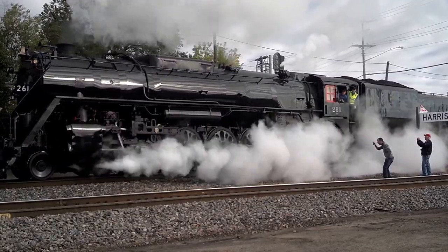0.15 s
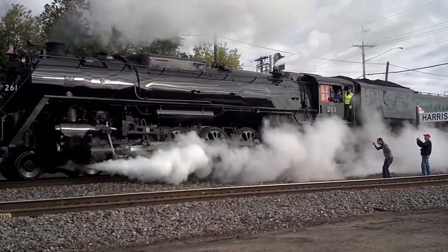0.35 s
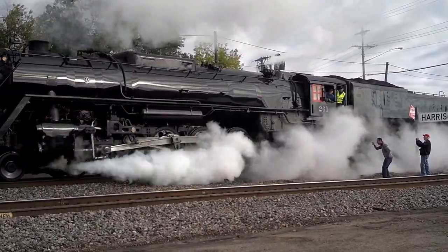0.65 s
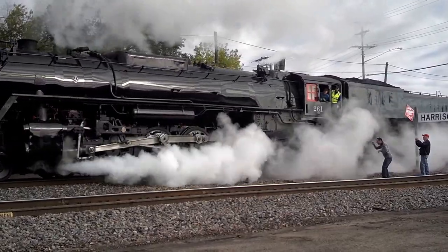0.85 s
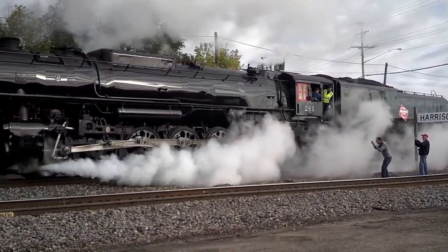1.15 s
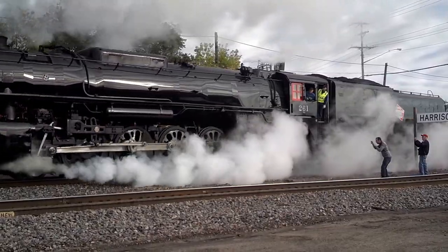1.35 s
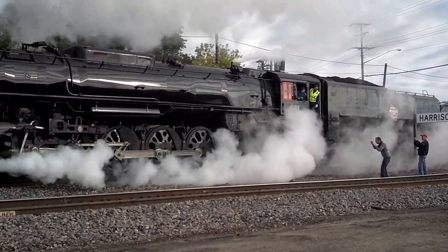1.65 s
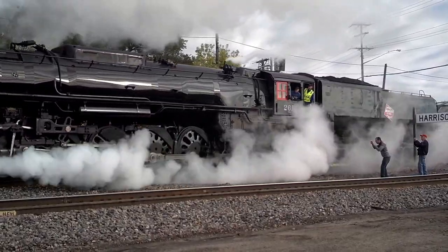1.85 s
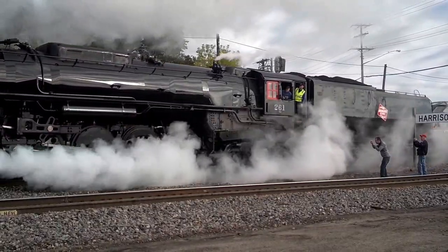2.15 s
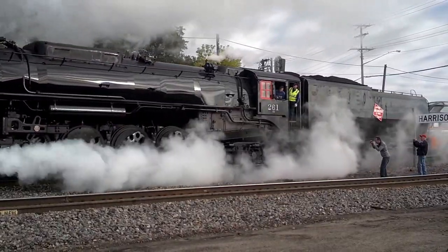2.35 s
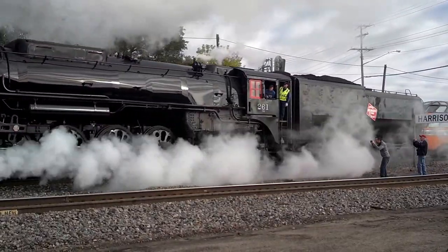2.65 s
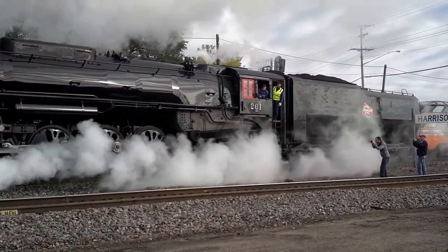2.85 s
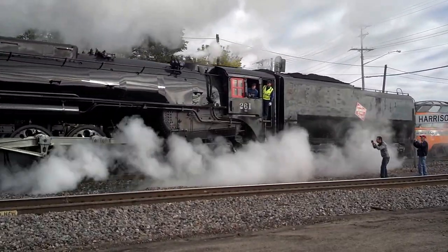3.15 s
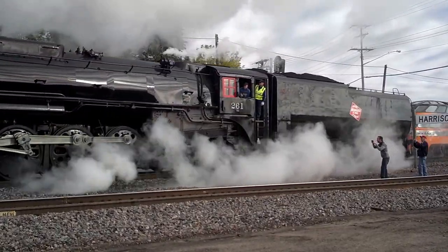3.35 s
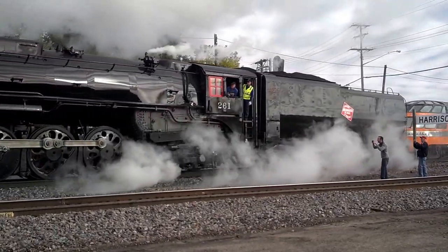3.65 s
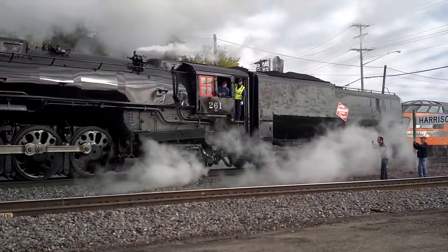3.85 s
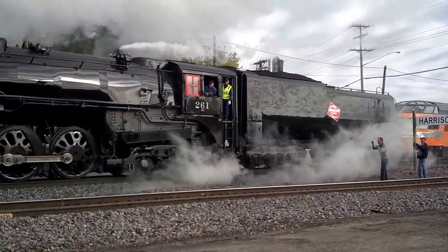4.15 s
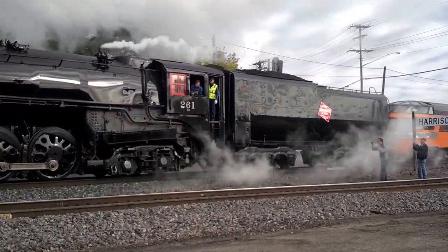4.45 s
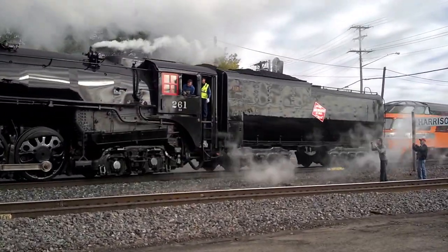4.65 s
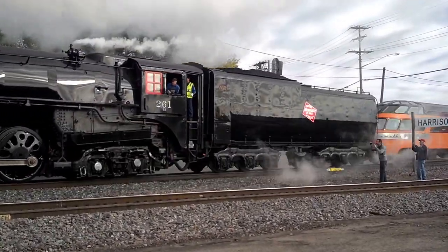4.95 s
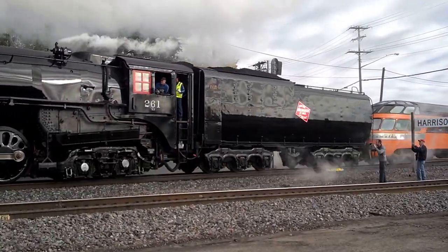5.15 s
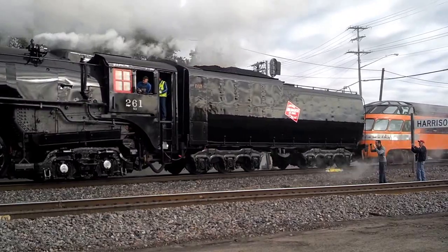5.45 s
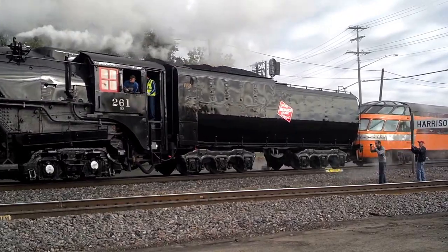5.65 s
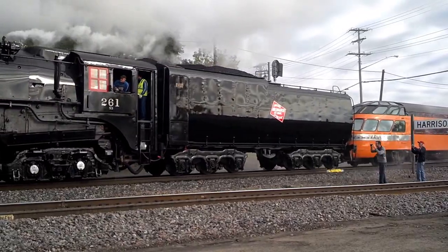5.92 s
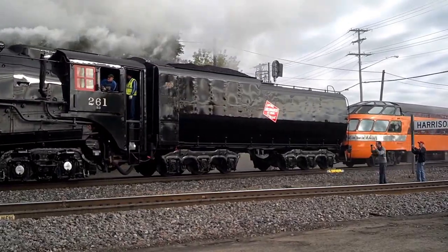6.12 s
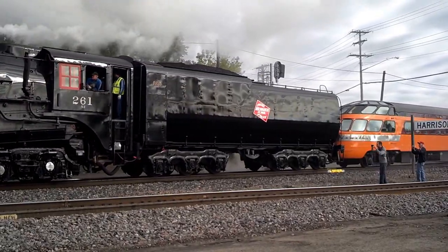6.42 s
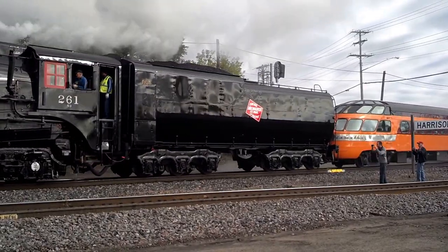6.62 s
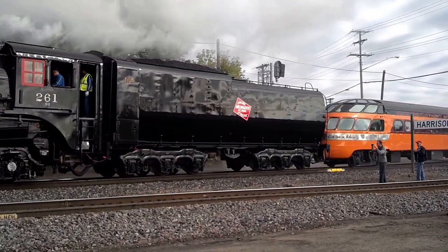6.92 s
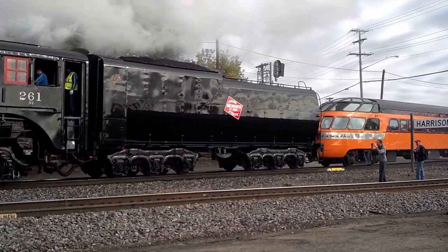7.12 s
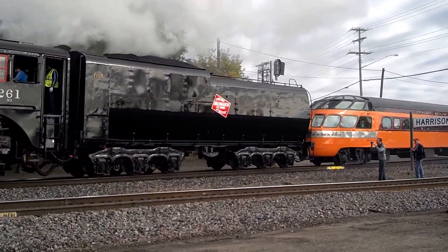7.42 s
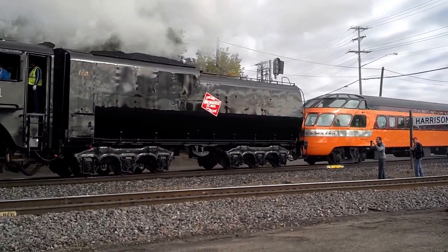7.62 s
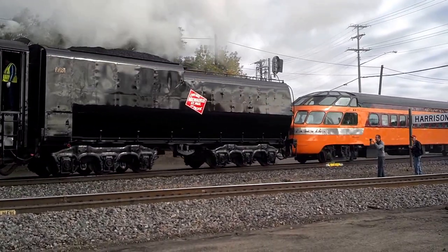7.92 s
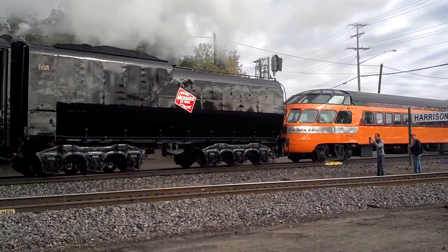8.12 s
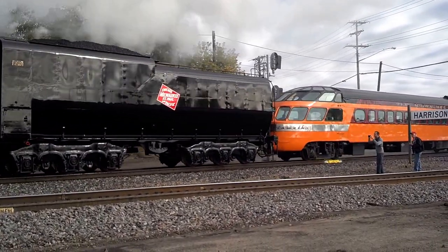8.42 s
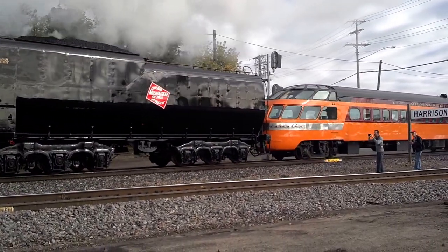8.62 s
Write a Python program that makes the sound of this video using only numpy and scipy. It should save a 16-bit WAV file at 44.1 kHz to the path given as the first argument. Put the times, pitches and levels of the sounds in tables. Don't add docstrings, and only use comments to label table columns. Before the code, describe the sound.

Outdoors beside the track, a steam locomotive pulls away. A low seeping hiss snaps into a one-second blast of bright, roaring steam, dips, then blasts again. A third blow is cut short and the steam shuts off. Much quieter afterwards: leaking hiss with soft puffs, dull regular chuffs, a thin high whistle and turbine whine, while wind bumps and rumbles on the close wide stereo microphone, heavier on the right.

```python
import sys
import numpy as np
from scipy import signal
from scipy.fft import rfft, irfft, next_fast_len
from scipy.io import wavfile
from scipy.ndimage import uniform_filter1d

SR = 44100
rng = np.random.default_rng(int(sys.argv[2]) if len(sys.argv) > 2 else 0)


def volts_from_db(level):
    exponent = np.asarray(level, float) / 20
    return 10 ** exponent


def unload_wav(signal):
    wavfile.write(
        sys.argv[1],
        SR,
        np.round(np.clip(np.atleast_2d(signal).T, -1, 1) * 32767).astype(np.int16),
    )


N = 387198
FRAME, HOP = 512, 128
SHUT_S = 2.872

# f/Hz, level/dB
JET_COLOUR = [(90, -12), (190, -7), (300, -13.5), (700, -4), (1200, 1.5), (1700, 3.5), (2200, -2.5),
              (2900, 3.5), (3900, -2), (5000, 4.5), (6500, -1), (8000, -1), (9500, 2.5), (11500, 1),
              (13200, 2.5), (15500, 1.5)]
# f/Hz, width/Hz, level/dB, drift/dB per s as the jet turns
NOZZLE_BANDS = [(1750, 210, 4, -2.5), (2060, 230, 1, 1.5), (2920, 80, -1.4, 1), (4380, 210, -2, 2.7),
                (5230, 68, -5, 0), (8470, 220, 3.5, 1.2), (13850, 2000, 3, -0.7)]
# opens t/s, blow/s, pressure level/dB, sag/dB, seep before/s
STROKES = [
    (0.228, 0.98, -19, -3.5, 0.23),
    (1.519, 1.01, -18.5, -3.5, 0.25),
    (2.816, 0.072, -19, 0.1, 0.17),
]
# t/s, level/dB
LEAK_LEVEL = [(2.9, -37.5), (3.6, -43.5), (4.1, -47.5), (4.6, -46), (5.2, -48), (5.45, -45), (5.85, -45.5),
              (6.1, -48), (6.4, -47), (6.85, -49), (7.25, -53.5), (7.5, -51.5), (7.65, -47), (7.95, -45.5),
              (8.25, -47), (8.45, -53.5), (8.78, -50.5)]
# f/Hz, level/dB
LEAK_COLOUR = [(60, 1), (150, 17.5), (400, -1.5), (650, -3.5), (850, 2.5), (1200, -2.5), (1600, 0.5),
               (2000, 2.5), (3500, 1.5), (5000, 3), (7000, -1.5), (10000, 1), (15500, -3)]
# t/s, level over hiss/dB, length/s, fizz level/dB
PUFFS = [
    (3.167, 2.5, 0.039, 4),
    (3.822, 7, 0.13, -2),
    (5.035, 8, 0.16, -7),
    (6.195, 7, 0.17, 0),
    (7.097, 6.5, 0.21, -5),
    (8.293, 4, 0.064, 2),
]
# t/s, level/dB, length/s, brightness/dB
CHUFFS = [
    (3.857, -38, 0.11, -5.5),
    (4.466, -30.5, 0.12, -14),
    (5.073, -29.5, 0.16, -11),
    (5.642, -29, 0.1, -17),
    (6.21, -30.5, 0.094, -9),
    (6.788, -30.5, 0.14, -4),
    (7.39, -34, 0.18, -3.5),
    (7.93, -32, 0.17, -9),
    (8.452, -39, 0.077, 1),
]
# f/Hz, width/Hz, level/dB
STACK = [(400, 97, 9.5), (1129, 60, -6), (1770, 46, -15), (2050, 660, -2.5)]
# multiple of shaft speed, level/dB, loudest t/s, span/s
SHAFT_ORDERS = [(13, -3, 5.7, 3.4), (14, -1, 7.5, 2.4), (15, -16, 8.0, 0.9), (16, -1, 4.5, 2.5),
                (23, -11, 2.9, 6), (24, -5.5, 4.7, 2), (24, -9.5, 7.94, 1.4), (30, -10, 3, 5.9),
                (31, -4.5, 5.3, 1.7), (34, -10.5, 3, 6.6), (42, -4, 14.3, 11.5), (52, -5, 5.1, 4.2),
                (58, -6.5, 5.3, 6.3), (59, -5.5, 8.4, 1.8), (59, -7, 4.9, 1.5), (63, -9, 5.1, 1.3),
                (64, -7, 8.25, 1.7), (84.3, -6, 6.9, 1.6), (88.7, -8.5, 5.9, 9), (180, -1, 8.8, 3.4)]
# t/s, blade tone level/dB, length/s
SURGES = [(3.5, -66, 0.44), (4.47, -53.5, 0.2), (4.76, -52, 0.16), (4.97, -64, 0.24), (5.4, -55.5, 0.43),
          (6.27, -63, 0.33), (6.65, -68, 0.27), (7.7, -70, 0.16), (7.92, -64, 0.15), (8.25, -57.5, 0.16),
          (8.74, -55.5, 0.28)]
# t/s, level/dB, length/s
SWELLS = [(3.05, -55, 0.052), (3.25, -46, 0.17), (3.55, -46.5, 0.42), (3.82, -47.5, 0.36),
          (4.15, -47, 0.14), (4.42, -51, 0.29), (4.65, -51, 0.13), (4.83, -44, 0.19), (5.03, -57, 0.06),
          (5.14, -56, 0.065), (5.25, -44, 0.16), (5.55, -38.5, 0.15), (5.86, -38.5, 0.13),
          (6.02, -48, 0.098), (6.23, -47, 0.12), (6.35, -48, 0.1), (6.54, -56, 0.089), (6.67, -46.5, 0.38),
          (6.86, -41.5, 0.15), (7.14, -50, 0.14), (7.42, -53, 0.085), (7.57, -62, 0.062), (7.74, -53, 0.33),
          (8.0, -46.5, 0.21), (8.34, -43.5, 0.2), (8.66, -50.5, 0.23)]
# t/s, level/dB, length/s
GUSTS = [(3.22, -31, 0.16), (3.49, -35, 0.053), (3.6, -39, 0.042), (3.75, -32, 0.076), (3.87, -39, 0.036),
         (4.2, -50, 0.18), (4.5, -41.5, 0.27), (4.91, -39.5, 0.12), (5.05, -35.5, 0.2), (5.2, -41, 0.068),
         (5.28, -46, 0.04), (5.63, -40, 0.13), (5.93, -40.5, 0.26), (6.25, -36, 0.21), (6.41, -26, 0.029),
         (6.59, -29, 0.02), (6.8, -33, 0.23), (6.99, -41, 0.04), (7.15, -31, 0.14), (7.24, -38, 0.025),
         (7.39, -36, 0.17), (7.57, -38, 0.017), (7.93, -30, 0.13), (8.1, -37, 0.097), (8.21, -33, 0.072),
         (8.33, -33.5, 0.15), (8.4, -37, 0.22), (8.51, -35, 0.082), (8.64, -28.5, 0.1), (8.78, -33, 0.1)]
# f/Hz, level/dB
WIND_COLOUR = [(25, -28), (60, -16), (100, 5), (150, 4), (220, -2), (320, -4), (480, -10), (700, -23),
               (1000, -30.5), (1500, -41.5)]
# t/s, level/dB, length/s
BLASTS = [(0.68, -42, 0.53), (2.08, -43.5, 0.22), (2.45, -49, 0.22), (0.31, -37, 0.2), (0.52, -32, 0.075),
          (0.63, -40, 0.029), (0.82, -31.5, 0.03), (0.94, -29, 0.15), (1.15, -49, 0.11),
          (1.56, -27.5, 0.062), (1.62, -27.5, 0.045), (1.72, -29, 0.09), (1.86, -28, 0.14),
          (1.99, -27.5, 0.17), (2.15, -36, 0.15), (2.28, -28, 0.15), (2.85, -34.5, 0.064)]
# f/Hz, level/dB
BLAST_COLOUR = [(25, -44.5), (60, -3), (120, -5), (200, 1.5), (330, 1.5), (500, -4), (800, -9),
                (1500, -24.5)]
# t/s, peak level/dB, f/Hz, sharpness/dB
BUFFETS = [(3.498, -27, 352, -17), (3.757, -25.5, 348, -9), (4.87, -18, 258, -11), (4.902, -27, 393, -5),
           (5.013, -21, 264, -14), (5.035, -10, 196, -15), (5.206, -15.5, 180, -8), (5.279, -20, 364, -16),
           (5.391, -32, 250, -2), (5.594, -23, 355, -14), (5.62, -23, 372, -6), (5.884, -18.5, 315, -17),
           (5.93, -15, 214, -17), (6.062, -26, 366, -8), (6.18, -23, 355, -11), (6.262, -27, 253, -7),
           (6.407, -13, 340, -8), (6.585, -33, 369, -22), (6.699, -27, 410, -14), (6.732, -36, 315, -4),
           (6.761, -21, 404, -10), (6.787, -30, 450, -7), (6.859, -21, 353, -11), (6.974, -29, 445, -1),
           (7.073, -18.5, 223, -2), (7.113, -26, 347, 0), (7.154, -11, 199, -7), (7.185, -17.5, 290, -1),
           (7.241, -16.5, 239, -1), (7.31, -24, 335, -14), (7.383, -22, 466, -16), (7.484, -19, 288, 0.5),
           (7.703, -15.5, 434, -13), (7.851, -31, 390, -6), (7.893, -27, 444, -11), (8.176, -18.5, 346, -8),
           (8.201, -16, 370, -11), (8.28, -20, 256, -4), (8.309, -13.5, 366, -25), (8.375, -20, 191, -4),
           (8.39, -23.5, 420, 0.5), (8.395, -12, 277, 2.5), (8.422, -20, 440, -16),
           (8.511, -17.5, 377, -20), (8.534, -28, 242, -4), (8.595, -20, 385, -11),
           (8.622, -16.5, 430, -4.5), (8.706, -35, 313, 0), (8.726, -19, 310, -19)]
# t/s, peak level/dB, f/Hz, sharpness/dB
JOLTS = [(0.283, -27, 519, 1), (0.437, -31, 439, -3), (0.509, -16, 287, -20), (0.608, -27, 495, -7),
         (0.667, -35, 390, -12), (0.794, -25, 331, 0), (0.821, -35, 293, -23), (0.888, -36, 340, -6),
         (0.939, -23, 430, -16), (1.101, -44, 406, -4), (1.367, -34, 275, -7), (1.52, -32, 474, -6),
         (1.555, -12.5, 277, -8), (1.609, -18, 387, -15), (1.78, -22.5, 353, -10), (1.823, -25, 312, -4),
         (1.901, -19.5, 453, 4), (1.934, -31, 463, -18), (2.119, -23, 484, -7), (2.191, -19.5, 386, -12),
         (2.242, -23, 360, 4)]
# f/Hz, left over right level/dB
PORT_BALANCE = [(300, -10), (1000, -1), (2000, -2.5), (3500, -2), (5000, 1.5), (6200, 6.5), (9000, 5),
                (15000, -9.5)]
# f/Hz, correlation
PORT_LIKENESS = [(300, 0.3), (900, 0.6), (1600, -0.67), (2300, -0.094), (3300, 0.18), (5000, -0.056),
                 (7000, 0.36), (15000, -0.12)]


def jet():
    seep_db, build_db, snap_s = -9.5, -5, 0.013
    hold, sag, close_s = 0.78, 0.089, 0.076
    seep_roar_db, blow_roar_db, sag_roar_db = 2, -2.5, -2.5
    hz, t = bins_and_frames()
    t = t[t < SHUT_S + 0.5]
    corners = []  # t/s, pressure/dB, roar/dB
    for s, blow, db, sag_db, seep_s in STROKES:
        corners += [
            (s - snap_s - seep_s, db + seep_db, seep_roar_db),
            (s - snap_s, db + build_db, 0),
            (s, db, blow_roar_db),
            (s + hold * blow, db - 0.5, blow_roar_db),
            (s + (hold + sag) * blow, db + sag_db, sag_roar_db),
            (s + blow, db + sag_db - 0.6, sag_roar_db),
            (s + blow + close_s, db + seep_db, seep_roar_db)]
    pressure_db, roar_db = follow(sorted(corners), np.minimum(t, SHUT_S))
    roar_db = roar_db + 42 * bumps(BLASTS, t)
    colour = read(JET_COLOUR, hz)
    for f, width, db, drift in NOZZLE_BANDS:
        colour = colour + (db + drift * t) * np.exp(-0.5 * ((hz - f) / width) ** 2)
    since = np.maximum(t - SHUT_S, 0)
    shut_db = -10.5 * (1 - np.exp(-since / 0.015)) - 130 * since
    last = STROKES[-1][0]
    pressure_db = pressure_db - 0.7 * np.interp(t, [last - 0.2, last - 0.12, last - snap_s, last], [0, 1, 1, 0])
    treble_db = 0.25 * (pressure_db - pressure_db.max()) + 2 * (t > last - snap_s)
    low = 1 / (1 + (hz / 2500) ** 2)
    high = 1 / (1 + (8000 / (hz + 1)) ** 4)
    field_db = colour + pressure_db + low * roar_db + high * treble_db + shut_db - 21.0
    return steam(field_db, patch_db=1.3, flicker_db=0.69)


def leaks():
    hz, t = bins_and_frames()
    hiss_db = follow(LEAK_LEVEL, t)[0]
    bells = [np.exp(-0.5 * ((t - s) / (0.21 * length)) ** 2) for s, _, length, _ in PUFFS]
    puff_db = np.array(PUFFS)[:, 1] @ bells
    fizz_db = 2 + np.array(PUFFS)[:, 3] @ bells
    roll_db = 9 - 0.15 * (hiss_db - hiss_db.mean() + puff_db)
    high = 1 / (1 + (7000 / (hz + 1)) ** 4)
    low = 1 / (1 + (hz / 2600) ** 4)
    ring_db = np.exp(-0.5 * ((hz - 3350) / 150) ** 2 - 0.5 * ((t - 8.6) / 0.5) ** 2)
    ground_db = -3 * np.exp(-0.5 * ((hz - 2750) / 250) ** 2)
    field_db = read(LEAK_COLOUR, hz) + ground_db + ring_db + hiss_db + puff_db
    field_db = field_db + high * fizz_db + low * roll_db + recovery(t) - 15.0
    return steam(field_db, patch_db=3.24, flicker_db=0.37)


def whistle():
    t = np.arange(N) / SR
    hz = 8103 - 7 * (t - SHUT_S)
    tone = np.sin(2 * np.pi * np.cumsum(hz + 7 * wander(500)) / SR)
    fuzz = evened(resonate(resonate(rng.standard_normal(N), hz, 51), hz, 51))
    skirt = evened(resonate(rng.standard_normal(N), hz + 150, 360))
    level = (volts_from_db(-61) + bumps(SWELLS, t)) * volts_from_db(19.0 + recovery(t))
    flutter = volts_from_db(1.8 * wander(600))
    return level * flutter * (0.85 * tone + 0.3 * fuzz + 0.05 * skirt)


def turbine():
    blades = 90
    t = np.arange(N) / SR
    blade_hz = 5190 - 3.6 * (t - SHUT_S)
    turns = np.cumsum(blade_hz / blades) / SR
    load = (volts_from_db(-69.5) + bumps(SURGES, t)) * volts_from_db(1.8 * wander(1500))
    out = volts_from_db(15.5) * load * np.sin(2 * np.pi * (blades * turns + 0.07 * wander(1200)))
    waver = volts_from_db(0.68 * wander(9000) + 1.7 * wander(2000))
    blur = 0.17 * wander(2500)
    for multiple, order_db, s, span in SHAFT_ORDERS:
        facing = np.exp(-2 * ((t - s) / span) ** 2)
        level = volts_from_db(order_db - 47) * np.roll(waver, rng.integers(N)) * facing
        phase = round(multiple) * turns + np.roll(blur, rng.integers(N)) + rng.random()
        out += level * np.sin(2 * np.pi * phase)
    return out * volts_from_db(recovery(t))


def chuffs():
    t = np.arange(N) / SR
    beats = [volts_from_db(db) * np.exp(-0.5 * ((t - s) / (0.24 * length)) ** 2) for s, db, length, _ in CHUFFS]
    noise = rng.standard_normal((2, N))
    tones = [volts_from_db(db) * evened(resonate(resonate(noise[0], f, width), f, width)) for f, width, db in STACK]
    body = evened(sum(tones))
    breath = sum(beat * volts_from_db(row[3] - 2.5) for beat, row in zip(beats, CHUFFS))
    return sum(beats) * body + breath * noise[1]


def wind():
    t, size = np.arange(N) / SR, next_fast_len(N)
    hz = np.fft.rfftfreq(size, 1 / SR)
    lumps = volts_from_db(np.minimum(3.2 * wander(250) + 1.6 * wander(70), 8))
    noise = rfft(rng.standard_normal((N, 2)).T * lumps, size)
    low, blast = [evened(irfft(noise * volts_from_db(read(colour, hz)), size)[:, :N])
                  for colour in (WIND_COLOUR, BLAST_COLOUR)]
    natural = (volts_from_db(-45.5) * (t > SHUT_S) + bumps(GUSTS, t)) * volts_from_db(recovery(t)) + volts_from_db(-55) * (t < SHUT_S)
    out = low * volts_from_db(9.5) * natural + blast * volts_from_db(7.5) * bumps(BLASTS, t)
    out = out * volts_from_db([[-8.5], [0]])
    add_eddies(out)
    return signal.sosfilt(signal.butter(3, 72, "high", fs=SR, output="sos"), out)


def add_eddies(out):
    rise_s, fade_s, sink = 0.0014, 0.0042, 0.51
    eddy_late_s, snap_late_s, snap_fade_s = 0.0015, 0.002, 0.00063
    eddies = BUFFETS + JOLTS
    u = np.arange(1300) / SR
    v = u - snap_late_s
    for (s, db, f, sharp_db), chance in zip(eddies, rng.random((len(eddies), 2))):
        turns = f * (u + sink * fade_s * (1 - np.exp(-u / fade_s)) - 0.27 * u)
        swing = np.sin(2 * np.pi * turns) * (1 - np.exp(-u / rise_s)) * np.exp(-u / fade_s)
        snap = volts_from_db(sharp_db) * 0.65 * np.cos(2 * np.pi * 1.66 * f * v) * np.exp(-abs(v) / snap_fade_s)
        sides = np.array([[volts_from_db(-23) * (2 * chance[1] - 0.5)], [1]]) * np.sign(chance[0] - 0.5)
        part = out[:, round((s + eddy_late_s) * SR):][:, :len(u)]
        part += (volts_from_db(db + 9.0) * sides * (swing + snap))[:, :part.shape[1]]


def steam(field_db, patch_db, flicker_db):
    a, b, c, d, patches = rng.standard_normal((field_db.shape[1], FRAME // 2 + 1, 5)).T
    flicker = evened(uniform_filter1d(patches[0], size=4))
    patches = evened(uniform_filter1d(uniform_filter1d(patches, size=5, axis=0), size=60, axis=1))
    hz = bins_and_frames()[0]
    same = np.clip(read(PORT_LIKENESS, hz), -0.95, 0.95)
    side = volts_from_db(read(PORT_BALANCE, hz))
    left = a + 1j * b
    right = same * left + np.sqrt(1 - same ** 2) * (c + 1j * d)
    z = np.array([side * left, right]) / np.sqrt(1 + side ** 2)
    z *= volts_from_db(field_db + patch_db * patches + flicker_db * flicker)
    out = signal.istft(z, nperseg=FRAME, noverlap=FRAME - HOP)[1]
    return np.pad(out, [(0, 0), (0, N)])[:, :N]


def bins_and_frames():
    return np.fft.rfftfreq(FRAME, 1 / SR)[:, None], np.arange(N // HOP + 5) * HOP / SR


def resonate(x, hz, width):
    turn = np.exp(2j * np.pi * np.cumsum(hz * np.ones(len(x))) / SR)
    r = np.exp(-np.pi * width / SR)
    return 2 * (turn * signal.lfilter([1 - r], [1, -r], x / turn)).real


def bumps(rows, t):
    at = np.arange(0, N + 1000, 64) / SR
    bells = sum(volts_from_db(db) * np.exp(-0.5 * ((at - s) / (0.3 * length)) ** 2) for s, db, length in rows)
    return np.interp(t, at, bells)


def recovery(t):
    return -11 * np.maximum(4.473 - t, 0) - 30 * (t < SHUT_S)


def wander(span):
    return evened(uniform_filter1d(uniform_filter1d(rng.standard_normal(N), span), span))


def evened(x):
    return x / np.sqrt(np.mean(x ** 2) + 1e-20)


def read(points, hz):
    f, value = np.transpose(points)
    return np.interp(np.log(hz + 1), np.log(f + 1), value)


def follow(rows, t):
    s, *columns = np.transpose(rows)
    return [np.interp(t, s, c) for c in columns]


def placed(x, left_db, late):
    right = np.interp(np.arange(N) - late - 0.91 * wander(6000), np.arange(N), x)
    return np.array([volts_from_db(left_db) * x, right]) / np.sqrt(1 + volts_from_db(2 * left_db))


def scene():
    air = wind()
    air_db = 10 * np.log10(abs(uniform_filter1d((air ** 2).sum(0), 1500)) + 1e-12)
    pump = volts_from_db(-0.2 * uniform_filter1d(np.maximum(air_db + 19, 0), 1200, origin=500))
    tones = placed(turbine(), 0.5, 1.53) + placed(whistle(), 24, 1.03)
    return jet() + air + placed(chuffs(), -11.0, 8.0) + pump * (leaks() + tones)


def roll_off(x):
    return signal.sosfilt(signal.butter(12, 15760, fs=SR, output="sos"), x)


def record(dry):
    spread = dry - np.roll(dry[::-1], 16, axis=1)
    return roll_off(spread)


dry = scene()
out = record(dry)
unload_wav(out)
```